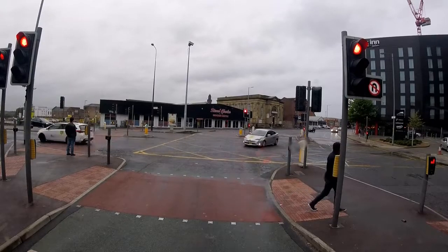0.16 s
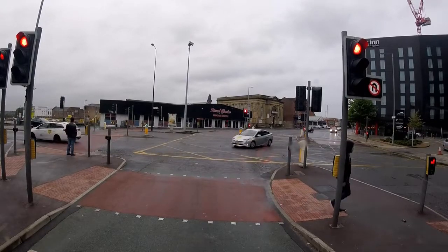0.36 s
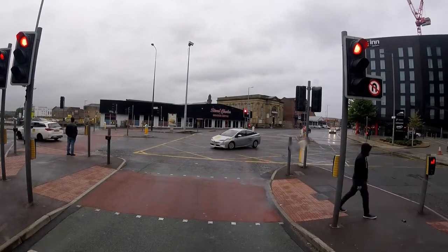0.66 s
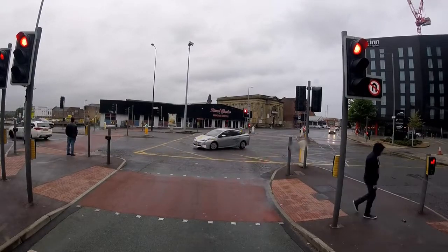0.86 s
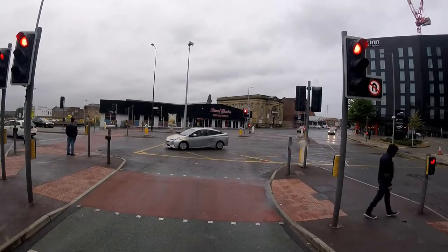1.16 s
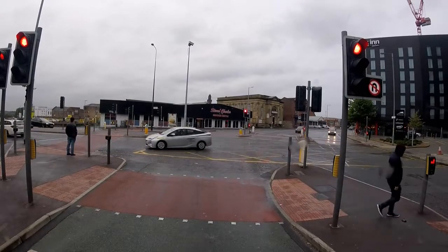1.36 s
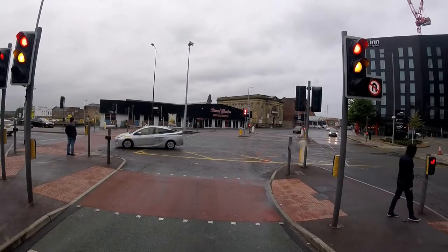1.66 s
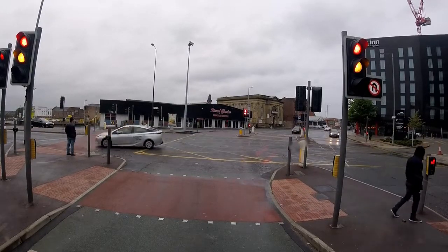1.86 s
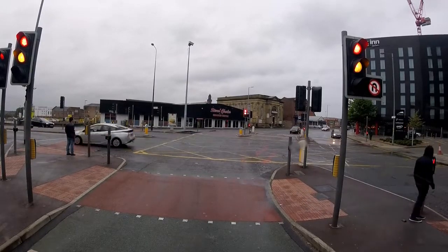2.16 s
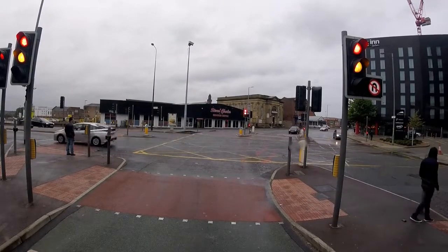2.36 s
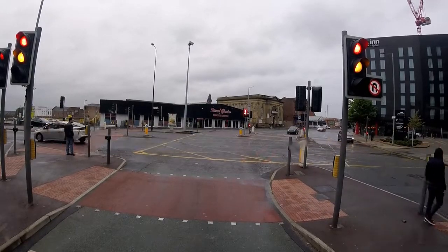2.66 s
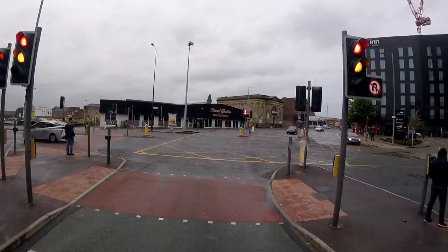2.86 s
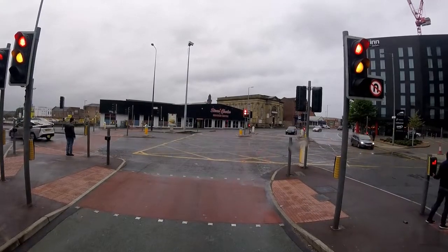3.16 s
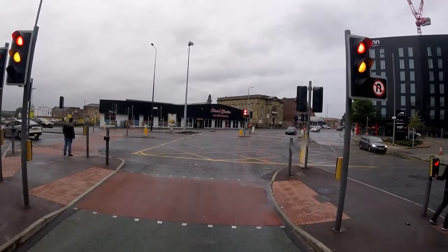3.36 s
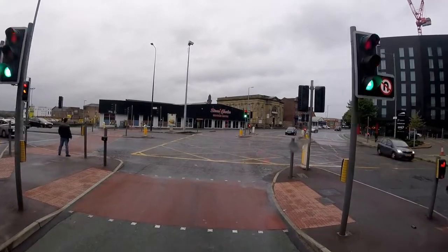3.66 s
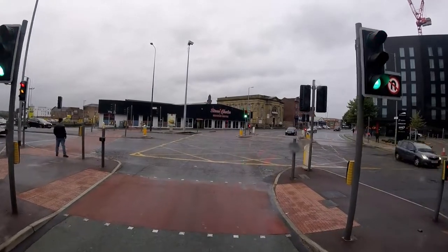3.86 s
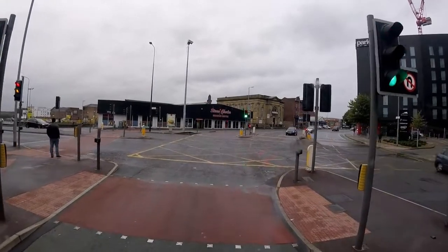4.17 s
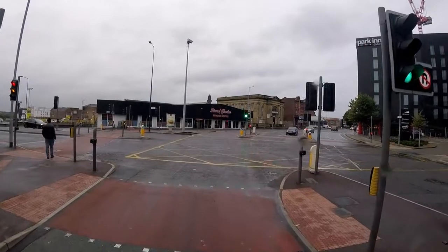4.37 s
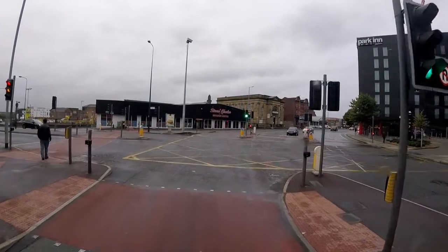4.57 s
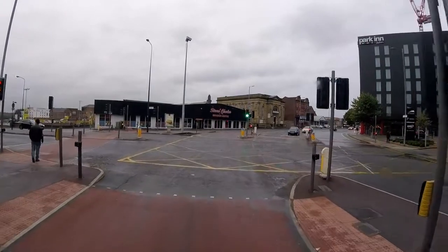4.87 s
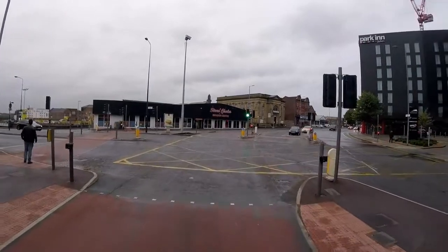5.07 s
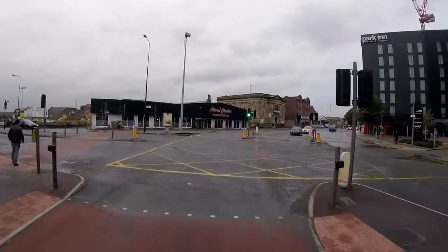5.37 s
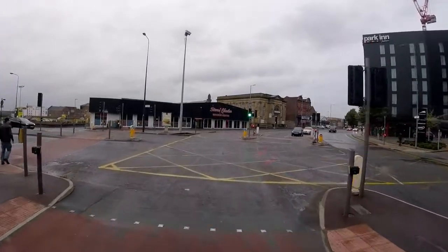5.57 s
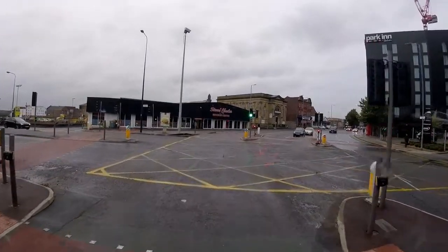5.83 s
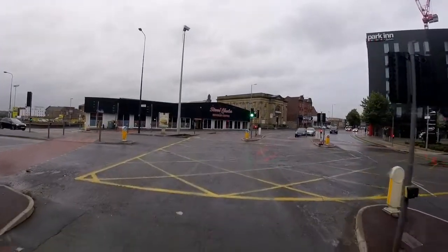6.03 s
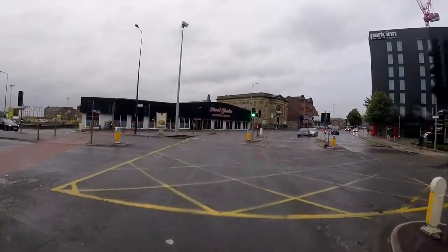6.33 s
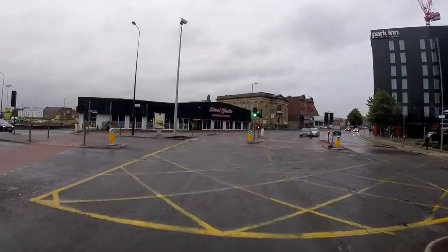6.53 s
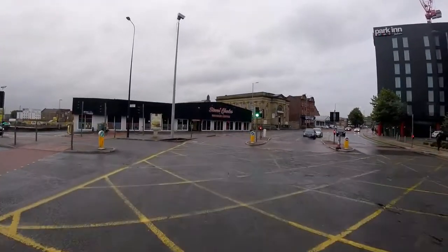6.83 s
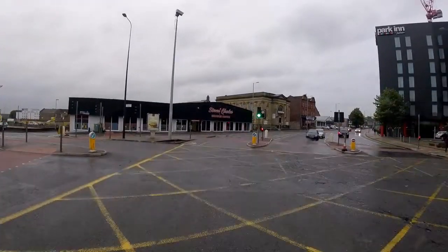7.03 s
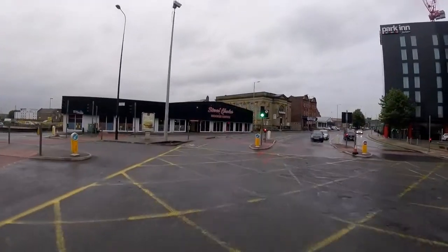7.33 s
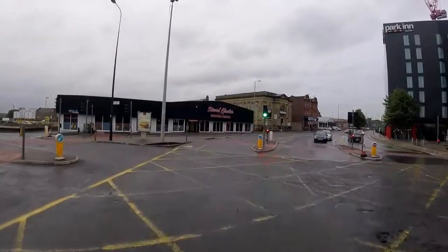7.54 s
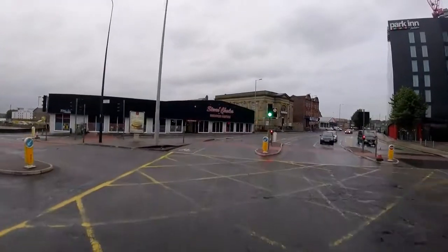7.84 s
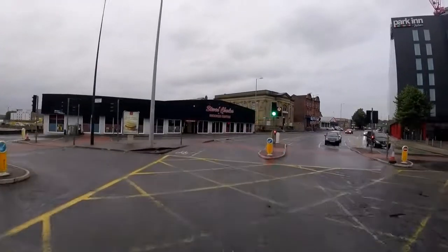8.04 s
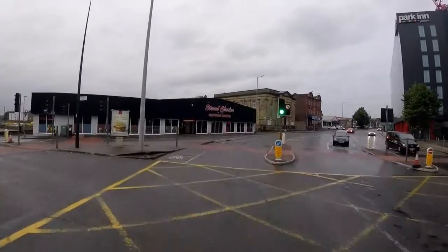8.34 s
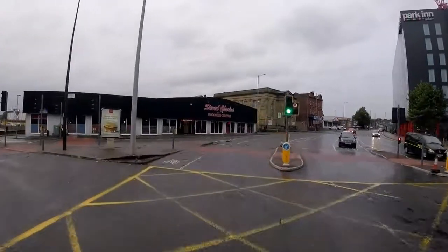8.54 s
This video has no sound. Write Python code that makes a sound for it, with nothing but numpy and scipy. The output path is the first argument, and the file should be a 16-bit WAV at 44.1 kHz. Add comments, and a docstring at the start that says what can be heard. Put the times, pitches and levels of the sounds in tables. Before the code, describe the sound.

Inside the front of a bus, close to the windscreen, a diesel idles low and steady over a ventilation hum. A tiny squeak and firm clack release the brake, the revs sag with a soft groan, then climb in swelling booms and a growl. A loose strip chatters, the engine peaks, changes up with a short squeak and knock, and its pitch falls as tyres hiss and fittings rattle.

```python
"""A diesel idles at traffic lights; a squeak and a clack let the brake off, the revs sag, climb and change up.
We are at the front of a bus, with a camera's microphone close to the windscreen. Firing tones boom as the revs
sweep through the saloon's resonances; pulsed noise clatters and growls. Shaped noise makes the tyres, body
rumble, brake groan and rattles, decaying noise and tones the knocks and squeaks, steady sines the ventilation.
A limiter holds the loud peaks down, so each strong boom ducks all the other sounds."""
import sys
import numpy as np
from scipy import signal
from scipy.fft import rfft, irfft
from scipy.io import wavfile
from scipy.ndimage import uniform_filter1d, minimum_filter1d

SR = 44100
rng = np.random.default_rng(int(sys.argv[2]) if len(sys.argv) > 2 else 0)


def to_wav(sig):
    """Store sig (one row per channel, or 1-D mono) as 16-bit WAV at the path in sys.argv[1].

    Samples outside -1..1 are clipped; the rate is SR.
    """
    pcm = np.clip(np.atleast_2d(sig), -1, 1) * 32767
    pcm = np.round(pcm).astype(np.int16)
    wavfile.write(sys.argv[1], SR, pcm.T)  # frames by channels


N = 383669

# All spectra give a relative outline: (frequency [Hz], level per Hz [dB]).
# Engine speed: (time [s], firing rate [Hz])
FIRING_RATE = [(0, 35.24), (2.3, 34.64), (2.48, 36.18), (2.62, 31.45), (2.75, 28.52), (3.02, 30.93),
               (3.13, 34.75), (3.21, 39), (4.45, 56.13), (5, 63.23), (5.4, 67.43), (5.9, 73.72),
               (6.2, 79.17), (6.7, 88.08), (7.2, 96.85), (7.4, 89.95), (7.75, 70.02), (8.15, 55.5),
               (8.5, 61.4), (8.7, 59.85)]
# The driver's foot: (time [s], throttle [0-1])
THROTTLE = [(3.1, 0), (3.45, .3), (3.68, .6), (4.05, .36), (4.5, 0.53), (5.05, 0.94), (5.6, .9), (6, .93),
            (6.4, 0.8), (6.8, 0.25), (8.7, 0.19)]
# The engine idles until IDLE_END_S, then takes up the drive over LEAVE_S
IDLE_END_S, LEAVE_S = 2.58, .25
# The bus starts to roll at ROLL_S and gathers speed evenly for GATHER_S
ROLL_S, GATHER_S = 3.1, 3.6

# Engine orders that boom: (multiple of firing rate [1], level at idle [dB], level when pulling [dB])
BOOM_ORDERS = [(1, 0, .5), (1.5, -28, -15), (2, -12.5, -10), (3, -10.5, -22), (4, -18, -19), (5, -22, -29),
               (6, -14, -29), (7, -19, -31), (8, -24.5, -34), (9, -25, -36), (10, -23.5, -35),
               (12, -22, -36), (14, -19, -33)]
# Air resonances of the saloon: (frequency [Hz], width [Hz], level [dB])
SALOON_MODES = [(30.3, 6.1, -2.5), (41.9, 11, -7.5), (51.8, 14.4, -3.5), (62, 19, -13), (89.25, 15.7, -6.5),
                (118.2, 15.4, -3.5), (136.9, 12, -11), (161, 27, -11), (198, 50, -15.5), (251.6, 19, -11.5),
                (287.4, 22, -7.5), (332.5, 55, -11.5), (369, 27, -10), (440, 61, -16)]
# Narrow bands where they cancel at the windscreen: (frequency [Hz], width [Hz], level [dB])
SALOON_NULLS = [(58, 7, -6), (109, 2.7, -7)]
# The gearbox changes up and unloads the engine: middle, length and depth of the dip in the firing tone
SHIFT_S, SHIFT_LENGTH_S, SHIFT_DIP_DB = 7.17, 0.34, -11
# The engine shudders as the drive bites: middle, length and rise of the swell in its lowest overtones
BITE_S, BITE_LENGTH_S, BITE_DB = 3.3, .5, 5
# Tones between the firing orders, from unequal cylinders, relative to the drone:
# (multiple of firing rate [1], level at idle [dB], level when pulling [dB])
BETWEEN_ORDERS = [(.5, -19, -12), (.75, -28, -9), (1.25, -24, -9), (1.75, -20, -11), (2.5, -26, -20)]
# The drone is least at CALM_HZ and grows as the engine lugs below it or races above it
CALM_HZ, DRONE_DB, LUG_DB_PER_OCTAVE, RACE_DB_PER_OCTAVE = 51.8, -25, 14.5, 9.5
# Spectrum of the drone: (frequency [Hz], level per Hz [dB])
DRONE_SPECTRUM = [(60, -0.5), (90, 4), (118, -4), (155, -2.5), (182, -12.5), (205, -4.5), (250, -3.5),
                  (290, -6), (375, -11.5), (410, -8.5), (490, -12), (520, -17), (700, -19), (1500, -34.5)]
# Spectrum of combustion clatter: (frequency [Hz], level per Hz [dB])
CLATTER_SPECTRUM = [(400, -13.5), (700, 0), (880, 4.5), (1100, 5.5), (1500, 2), (2100, -3), (2700, -8.5),
                    (3200, -14.5), (3900, -19), (4800, -28), (7000, -39.5)]
# Clatter: level when calm, rise with full throttle, share of the drone's rise in dB that it follows
CLATTER_DB, CLATTER_THROTTLE_DB, CLATTER_FOLLOWS = -40, 3.5, 0.42
# Spectrum of the intake growl: (frequency [Hz], level per Hz [dB])
GROWL_SPECTRUM = [(560, -17), (640, -12), (695, -2), (750, -11), (830, -5), (900, -8), (970, -3),
                  (1025, 2.5), (1065, 4), (1110, 3), (1150, -6), (1195, -12), (1230, -3), (1290, -1),
                  (1340, -10), (1550, -14), (2200, -22)]
# Growl: level with the foot off, rise with full throttle
GROWL_DB, GROWL_THROTTLE_DB = -47, 14.5

# Brake pads slipping as they let go: (time [s], level [dB])
BRAKE_LEVEL = [(2.4, -82), (2.6, -30), (3, -26.5), (3.25, -41), (3.6, -44)]
# Spectrum of their groan: (frequency [Hz], level per Hz [dB])
BRAKE_SPECTRUM = [(390, -24), (425, -1), (460, -2), (488, 6.5), (510, -16)]
# Squeaks: (time [s], length [s], start pitch [Hz], end pitch [Hz], level [dB], octave relative to it [dB],
# pitch flutter [share of pitch], attack [share of length])
SQUEAKS = [(2.304, .058, 6040, 5800, -34.5, -17, 0.01, .5), (7.197, 0.11, 3790, 3790, -35, -25, 0.025, .07)]
# Knocks and ticks of latch and trim, edge and ring relative to the knock:
# (time [s], level [dB], 60 dB decay [s], bright edge [dB], hollow ring [dB])
KNOCKS = [(2.4238, -20, 0.062, -25, 4), (2.437, -36, 0.14, -24, 0), (2.539, -33.5, 0.13, -35, -5),
          (2.559, -32.5, 0.11, -32, -3), (3.189, -40, 0.13, -12, -16), (3.341, -43, 0.12, -14, -6),
          (3.664, -46, 0.06, 1, -7), (3.686, -42, 0.25, -14, -9), (4.64, -39, .12, -19, -7),
          (5.222, -35, 0.2, -17, -12), (5.6245, -35.5, 0.1, -18.5, -5), (7.188, -32, 0.11, -14, 3),
          (7.605, -39, 0.08, -18, -6), (8.245, -34, 0.16, -18, -10), (8.319, -31.5, 0.27, -19, -11),
          (8.526, -29, 0.066, -17, -5)]
# First crack of a knock: level relative to its ring, time to decay by 60 dB
CRACK_DB, CRACK_T60_S = 3, .025
# Hollow ring of the housing: (frequency [Hz], level [dB], 60 dB decay [s])
HOUSING_MODES = [(402, -4.5, 0.086), (1416, 0, 0.042), (1590, 5, 0.054), (3040, -10, 0.061)]
# Spectrum of the panel: (frequency [Hz], level per Hz [dB])
PANEL_SPECTRUM = [(250, -4), (700, -2), (1100, -3), (1600, 0), (2000, -3), (2400, -4), (2650, -7),
                  (2950, -4), (3200, -6), (3400, -12), (3600, -10), (4150, -15), (4800, -22), (7000, -33)]
# Spectrum of its bright edge: (frequency [Hz], level per Hz [dB])
EDGE_SPECTRUM = [(3000, -20), (5000, 2), (6100, 4.5), (7000, -1.5), (8000, 0), (9500, -8), (11300, -7),
                 (13000, -22)]

# A loose metal strip chatters as the revs pass its resonance: (time [s], level [dB])
STRIP_TICKS = [(4.8, -39), (4.849, -40), (4.868, -38.5), (4.985, -35), (5.003, -42), (5.048, -41),
               (5.106, -36), (5.12, -33), (5.258, -43), (5.284, -44), (5.351, -43)]
# Decay of each tick by 60 dB, then decay and relative level of its tail in the saloon
CHATTER_T60_S, CHATTER_TAIL_T60_S, CHATTER_TAIL_DB = .085, .35, -14
# Between ticks the strip shivers against its seat: middle, length and level of the swell
SHIVER_S, SHIVER_LENGTH_S, SHIVER_DB = 5.16, .5, -40
# Spectrum of the strip's ring: (frequency [Hz], level per Hz [dB])
STRIP_SPECTRUM = [(1200, 2), (1500, 11), (2100, 13.5), (2600, 9), (3100, -2.5), (3700, 6.5), (4300, 0.5),
                  (5000, -7.5), (5600, -8.5), (6100, -2), (6700, -21), (8400, -21), (9800, -26),
                  (11200, -20), (13000, -24), (14000, -31)]
# The fittings rattle as the body twists after a jolt: (time of peak [s], length [s], level [dB])
RATTLES = [(3.67, .45, -37.5), (7.24, .24, -32.5), (7.5, 0.38, -38), (7.901, 0.34, -40), (8.36, 0.61, -40)]
# Spectrum of the rattling fittings: (frequency [Hz], level per Hz [dB])
FITTINGS_SPECTRUM = [(400, 10), (700, 3.5), (1200, 1), (2000, 0), (2800, -11.5), (4000, -15), (5000, -25),
                     (6200, -23), (8000, -27.5), (11000, -35)]

# Bumps in the road that heave the body: (time of peak [s], length [s], level [dB])
BUMPS = [(5.659, 0.2, -16.5), (6.145, 0.34, -39), (7.147, 0.48, -10), (7.795, 0.62, -11.5),
         (8.345, 0.81, -13)]
# Body rumble: level standing, and the amplitude added to it on a smooth road at full pace
STANDING_DB, ROAD_DB = -29, -15.5
# Spectrum of the body rumble: (frequency [Hz], level per Hz [dB])
RUMBLE_SPECTRUM = [(12, -22.5), (21, -12), (26, 1), (33, -10), (48, -7), (70, -16), (120, -16.5),
                   (165, -23), (300, -33)]
# Spectrum of the trim fizz: (frequency [Hz], level per Hz [dB])
FIZZ_SPECTRUM = [(2800, -7.5), (3700, 4.5), (4300, 0.5), (5200, -10), (6150, -3.5), (6800, -7.5),
                 (8000, -7.5), (11000, -11.5), (13000, -24), (15500, -31)]
# Trim fizz: level standing, change at full pace, change with full throttle
FIZZ_DB, FIZZ_ROAD_DB, FIZZ_THROTTLE_DB = -60, 3, -1.5
# Spectrum of the tyres on the wet road: (frequency [Hz], level per Hz [dB])
TYRE_SPECTRUM = [(160, 3.5), (230, 3.5), (380, -0.5), (550, -4.5), (1000, -13), (2000, -15), (2800, -20.5),
                 (4000, -27), (5000, -36), (6300, -38.5), (9000, -55.5)]
TYRES_DB = -29  # at full pace

# Ventilation lines: (multiple of shaft rate [1], level at idle [dB], level when pulling [dB])
VENT_LINES = [(1, -16.5, -33), (2, -31.5, -40), (2.35, -33, -42), (4, -37, -39), (5, -27.5, -36),
              (5.84, -49, -43), (8, -36, -47), (9.8, -44, -47), (10, -45.5, -53), (11, -47, -56),
              (12, -45.5, -52), (13, -48.5, -56), (14, -44.5, -48), (15, -52, -56), (18, -49.5, -54)]
VENT_HZ = 49.93  # shaft rate
# Spectrum of the ventilation buzz: (frequency [Hz], level per Hz [dB])
VENT_BUZZ_SPECTRUM = [(900, -10), (1100, 1), (1200, -3), (1340, 0), (1600, -5), (2500, -18), (4000, -36)]
# Pitches at which the echo off the windscreen cancels: (frequency [Hz], width [Hz], level [dB])
SCREEN_DIPS = [(181.7, 14, -3.5), (505, 17, -5), (886, 16, 0), (1193, 15, -3.5), (1635, 90, -2)]
# Tones of the camera's electronics: (frequency [Hz], width [Hz], level [dB])
WHINE_TONES = [(7760, 70, -77.5), (11700, 70, -82), (15600, 70, -93.5)]
TOP_HZ = 15700  # upper edge of the microphone channel


def undb(db):
    """Decibels to gain."""
    return 10 ** (np.asarray(db) / 20)


def unit(x):
    """Scale to rms 1."""
    return x / np.sqrt(np.mean(x ** 2))


def curves(table):
    """The columns of a time table, one value per sample."""
    s, *columns = np.transpose(table)
    return [np.interp(np.arange(N) / SR, s, c) for c in columns]


def colour(x, spectrum):
    """Filter by a spectrum outline with steep skirts outside it; rms 1."""
    hz, db = np.transpose(spectrum)
    log_hz = np.log(hz)
    f = np.log(np.maximum(np.fft.rfftfreq(N, 1 / SR), 1))
    outside = np.maximum(log_hz[0] - f, 0) + np.maximum(f - log_hz[-1], 0)
    gain_db = np.interp(f, log_hz, db) - 40 * outside
    return unit(irfft(rfft(x) * undb(gain_db), N))


def noise():
    """White noise."""
    return rng.standard_normal(N)


def walk(count):
    """Slow chance with about count turns a second; rms 1."""
    k = SR // count
    steps = np.repeat(rng.standard_normal(N // k + 1), k)
    return unit(uniform_filter1d(uniform_filter1d(steps, k), k)[:N])


def swell(middle_s, length_s):
    """Half a sine: rises from 0 to 1 at middle_s and falls back."""
    return np.cos(np.pi * np.clip((np.arange(N) / SR - middle_s) / length_s, -.5, .5))


def decay(t, t60_s):
    """Exponential decay from 1, by 60 dB in t60_s."""
    return np.exp(-np.log(1000) * t / t60_s)


def pulling():
    """0 while the engine idles, rising to 1 as it takes up the drive."""
    return np.clip((np.arange(N) / SR - IDLE_END_S) / LEAVE_S, 0, 1)


def road_speed():
    """0 while the bus stands, 1 at full pace."""
    return np.clip((np.arange(N) / SR - ROLL_S) / GATHER_S, 0, 1)


def saloon_gain(hz):
    """How strongly the saloon's air, with its resonances and nulls, answers a tone of this frequency."""
    def bell(centre, width):
        return 1 / (1 + (2 * (hz - centre) / width) ** 2)
    peaks = np.sqrt(sum((undb(db) * bell(centre, width)) ** 2 for centre, width, db in SALOON_MODES))
    nulls_db = sum(db * bell(centre, width) for centre, width, db in SALOON_NULLS)
    return peaks * undb(nulls_db)


def boom(phase, hz, waver_db=0.89, phase_wander=.06):
    """The firing tone and its overtones swell and fade as the revs carry them through the saloon's resonances."""
    load, out = pulling(), 0
    step = 16  # samples between updates of the resonance gain
    for order, idle_db, pull_db in BOOM_ORDERS:
        db = idle_db + load * (pull_db - idle_db)
        db = db + waver_db * np.sqrt(order) * walk(12)  # higher orders waver more
        if order == 1:
            db = db + SHIFT_DIP_DB * swell(SHIFT_S, SHIFT_LENGTH_S)
        if order in (2, 3):
            db = db + BITE_DB * swell(BITE_S, BITE_LENGTH_S)
        loose = phase_wander * order * load * walk(20)  # under load the firings stray in time
        tone = np.sin(order * phase + loose + rng.uniform(0, 2 * np.pi))
        resonance = np.repeat(saloon_gain(order * hz[::step]), step)[:N]
        out = out + undb(db) * resonance * tone
    return np.sqrt(2) * out


def drone_level(hz):
    """Level of the engine's drone in dB, by how far its speed is from the calmest one."""
    octaves = np.log2(hz / CALM_HZ)
    return DRONE_DB + np.maximum(-octaves * LUG_DB_PER_OCTAVE, octaves * RACE_DB_PER_OCTAVE)


def cycle_pattern(phase, size=2048):
    """Four unequal cylinders: a pattern of knocks that repeats every engine cycle and slowly changes."""
    cycle = phase / (4 * 2 * np.pi)  # four firings to a cycle
    patterns = uniform_filter1d(rng.standard_normal((2, size)), size=8, mode="wrap")
    first, second = (np.interp(cycle, np.arange(size) / size, p, period=1) for p in patterns)
    blend = walk(3)
    return unit(first * np.cos(blend) + second * np.sin(blend))


def engine_tones(phase, drone_db, waver_db=2.0, phase_wander=0.26):
    """Unequal cylinders add weak tones between the firing orders; their balance changes as the engine pulls."""
    load, out = pulling(), 0
    unrest = .5 + 2 * load  # firings are less even under load
    for order, idle_db, pull_db in BETWEEN_ORDERS:
        db = drone_db + idle_db + load * (pull_db - idle_db) + waver_db * unrest * walk(10)
        loose = phase_wander * unrest * walk(12)
        out = out + undb(db) * np.sin(order * phase + rng.uniform(0, 2 * np.pi) + loose)
    return np.sqrt(2) * out


def engine_lope(phase, drone_db, idle_db=-12, pull_db=-6):
    """The uneven knocks of each cycle ring the saloon."""
    db = drone_db + idle_db + pulling() * (pull_db - idle_db)
    return colour(cycle_pattern(phase), DRONE_SPECTRUM) * undb(db)


def engine_noise(phase, drone_db, throttle, knock_depth=0.051, growl_noise_db=3):
    """Combustion knock pulses once per firing, dulled by the saloon's length; the intake growls under throttle."""
    bursts = 1 + knock_depth * (np.cos(phase) + .5 * np.cos(2 * phase))
    clatter = colour(noise() * bursts, CLATTER_SPECTRUM)
    growl = colour(cycle_pattern(phase) + undb(growl_noise_db) * noise() * bursts, GROWL_SPECTRUM)
    clatter_db = CLATTER_DB + CLATTER_THROTTLE_DB * throttle + CLATTER_FOLLOWS * (drone_db - DRONE_DB)
    growl_db = GROWL_DB + GROWL_THROTTLE_DB * throttle ** 2
    return clatter * undb(clatter_db) + growl * undb(growl_db)


def brake():
    """The slipping pads groan in a narrow band of noise around the start of the creep."""
    return colour(noise(), BRAKE_SPECTRUM) * undb(curves(BRAKE_LEVEL)[0])


def squeaks(cabin_t60=0.24, wet_db=-5):
    """Rubbing parts catch and sing briefly; the saloon rings on after them."""
    out = np.zeros(N)
    for s, length, start_hz, end_hz, db, octave_db, flutter, attack in SQUEAKS:
        u = np.linspace(0, 1, int(length * SR))
        hz = (start_hz + (end_hz - start_hz) * u) * (1 + flutter * walk(500)[:len(u)])
        phase = 2 * np.pi * np.cumsum(hz) / SR
        grip = np.interp(u, [0, np.clip(attack, .01, .99), 1], [0, 1, 0]) ** 1.5
        tone = np.sin(phase) + undb(octave_db) * np.sin(2 * phase)
        start = int(s * SR)
        out[start:start + len(u)] += undb(db) * grip * tone
    t = np.arange(SR // 2) / SR
    tail = rng.standard_normal(len(t)) * decay(t, cabin_t60)
    return out + undb(wet_db) * signal.fftconvolve(out, tail / np.linalg.norm(tail))[:N]


def knocks(attack_s=0.0038):
    """Each knock cracks, then rings a panel's many short modes, its hard plastic edge and hollow housing."""
    panel, edge, out = colour(noise(), PANEL_SPECTRUM), colour(noise(), EDGE_SPECTRUM), np.zeros(N)
    t = np.arange(SR // 2) / SR
    hollow = sum(undb(db) * np.sin(2 * np.pi * hz * t) * decay(t, t60) for hz, db, t60 in HOUSING_MODES)
    onset = 1 - np.exp(-t / attack_s)
    for s, db, t60, edge_db, hollow_db in KNOCKS:
        span = slice(int(s * SR), int(s * SR) + len(t))
        ring = panel[span] + undb(edge_db) * edge[span]
        fade = decay(t, t60) + undb(CRACK_DB) * decay(t, CRACK_T60_S)
        n = len(ring)  # shorter at the very end
        out[span] += undb(db) * onset[:n] * (ring * fade[:n] + undb(hollow_db) * hollow[:n])
    return out


def chatter(attack_s=0.0024):
    """The strip strikes its seat in a run of short, bright ticks, which blur together in the saloon."""
    ticks = np.zeros(N)
    shiver = undb(SHIVER_DB) * swell(SHIVER_S, SHIVER_LENGTH_S) ** 2
    t = np.arange(SR // 2) / SR
    fade = decay(t, CHATTER_T60_S) + undb(CHATTER_TAIL_DB) * decay(t, CHATTER_TAIL_T60_S)
    onset = 1 - np.exp(-t / attack_s)
    for s, db in STRIP_TICKS:
        start = int(s * SR)
        ticks[start:start + len(t)] += undb(db) * onset * fade
    return colour(noise(), STRIP_SPECTRUM) * np.hypot(ticks, shiver)


def rattles(grain_db=2.0):
    """Seats and panels jostle: noise with a quick random flicker stands for a flurry of small contacts."""
    level = sum(undb(db) * swell(s, length) for s, length, db in RATTLES)
    return colour(noise() * undb(grain_db * walk(150)), FITTINGS_SPECTRUM) * level


def shaking():
    """How hard the body shakes on its springs: in step with road speed, with a swell at each bump."""
    heave = sum(undb(db) * swell(s, length) for s, length, db in BUMPS)
    return undb(STANDING_DB) + undb(ROAD_DB) * road_speed() + heave


def body(drone_db, throttle, idle_db=-8.0, moving_db=-6.5):
    """The shell rumbles with the road and drones with the engine; loose trim fizzes."""
    rumble = colour(noise(), RUMBLE_SPECTRUM) * shaking()
    shell_db = drone_db + idle_db + pulling() * (moving_db - idle_db)
    drone = colour(noise(), DRONE_SPECTRUM) * undb(shell_db)
    fizz_db = FIZZ_DB + FIZZ_ROAD_DB * road_speed() + FIZZ_THROTTLE_DB * throttle
    fizz = colour(noise() * undb(0.42 * walk(200)), FIZZ_SPECTRUM) * undb(fizz_db)
    return rumble + drone + fizz


def tyres(speed_power=1.4):
    """The tyres roar and hiss on the wet road, growing steeply with speed."""
    return colour(noise(), TYRE_SPECTRUM) * undb(TYRES_DB) * road_speed() ** speed_power


def ventilation(waver_db=2.0, buzz_db=-46.5, buzz_waver_db=2, buzz_pulling_db=-7):
    """A steady shaft hums in sines and buzzes in a pattern repeated every turn; the low hum fades on pulling."""
    phase = 2 * np.pi * VENT_HZ * np.arange(N) / SR
    load, hum = pulling(), 0
    for order, idle_db, pull_db in VENT_LINES:
        db = idle_db + load * (pull_db - idle_db) + waver_db * walk(5)
        hum = hum + undb(db) * np.sin(order * phase + rng.uniform(0, 2 * np.pi) + 0.092 * walk(8))
    turn = rng.standard_normal(round(SR / VENT_HZ))
    buzz = colour(np.resize(turn, N) * undb(buzz_waver_db * walk(25)), VENT_BUZZ_SPECTRUM)
    return np.sqrt(2) * hum + undb(buzz_db + buzz_pulling_db * load) * buzz


def windscreen(x):
    """Echo off the glass next to the microphone cancels narrow bands of the sound in the saloon."""
    f = np.fft.rfftfreq(N, 1 / SR)
    dips_db = sum(db / (1 + (2 * (f - hz) / width) ** 4) for hz, width, db in SCREEN_DIPS)
    return irfft(rfft(x) * undb(dips_db), N)


def whine():
    """Thin tones of unsteady pitch from the camera's electronics."""
    t, out = np.arange(N) / SR, 0
    for hz, width, db in WHINE_TONES:
        cycles = hz * t + np.cumsum(walk(300)) * width / 2 / SR
        out = out + undb(db) * np.sqrt(2) * np.sin(2 * np.pi * cycles)
    return out


def scene():
    """Everything heard from the front of the saloon, with the whine added at the microphone."""
    hz, = curves(FIRING_RATE)
    throttle, = curves(THROTTLE)
    drone_db = drone_level(hz)
    phase = 2 * np.pi * np.cumsum(hz) / SR
    engine = boom(phase, hz) + engine_tones(phase, drone_db)
    engine = engine + engine_lope(phase, drone_db) + engine_noise(phase, drone_db, throttle)
    parts = brake() + squeaks() + knocks() + chatter() + rattles()
    background = body(drone_db, throttle) + tyres() + ventilation()
    return (windscreen(engine + parts + background) + whine())[None]


def record(dry, drive_db=1, ceiling=0.7, release_db_per_s=14):
    """A look-ahead limiter ducks everything around peaks over the ceiling and recovers slowly; the top is cut."""
    loud = dry[0] * undb(drive_db)
    over_db = 20 * np.log10(np.maximum(np.abs(loud) / ceiling, 1))
    recovery_db = release_db_per_s * np.arange(N) / SR
    duck_db = np.maximum.accumulate(over_db + recovery_db) - recovery_db
    # centred windows, in samples, begin the ducking ahead of the peak
    gain = uniform_filter1d(minimum_filter1d(undb(-duck_db), size=1500), size=4000)
    top_cut = signal.ellip(8, .2, 70, TOP_HZ, fs=SR, output="sos")
    return signal.sosfilt(top_cut, loud * gain)[None]


dry = scene()
out = record(dry)
to_wav(out)
```